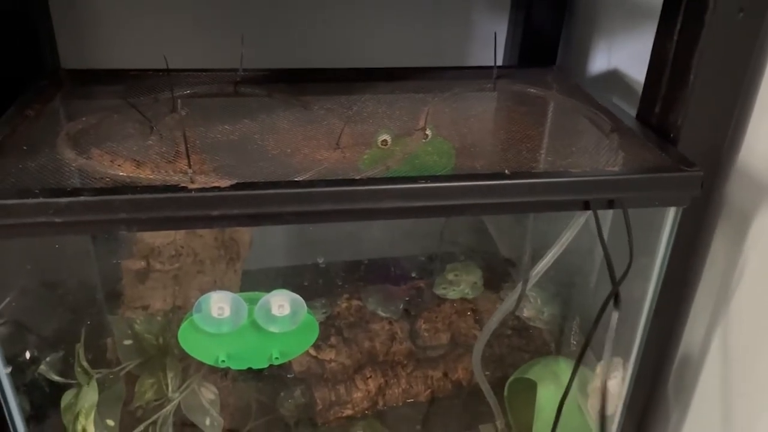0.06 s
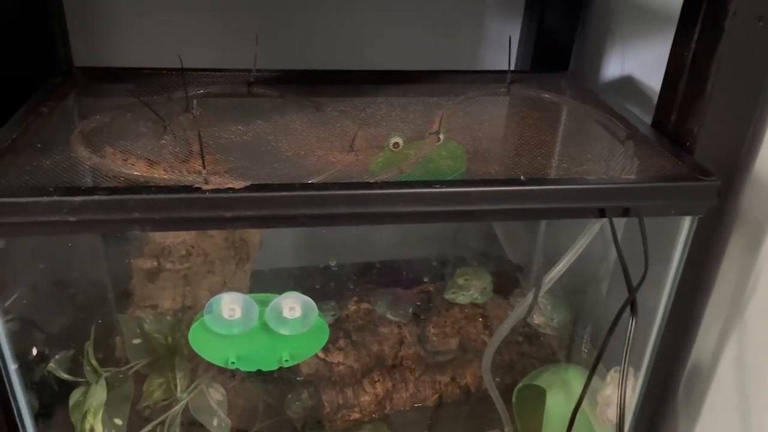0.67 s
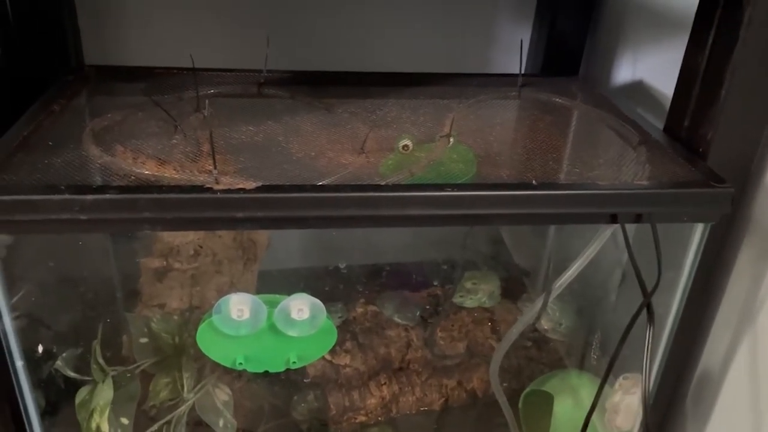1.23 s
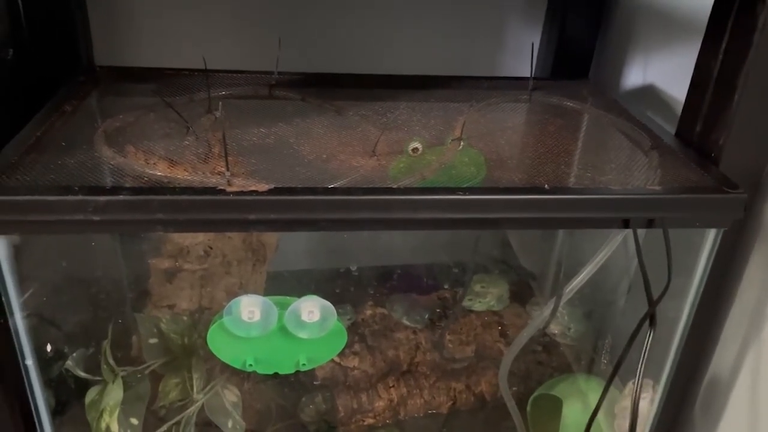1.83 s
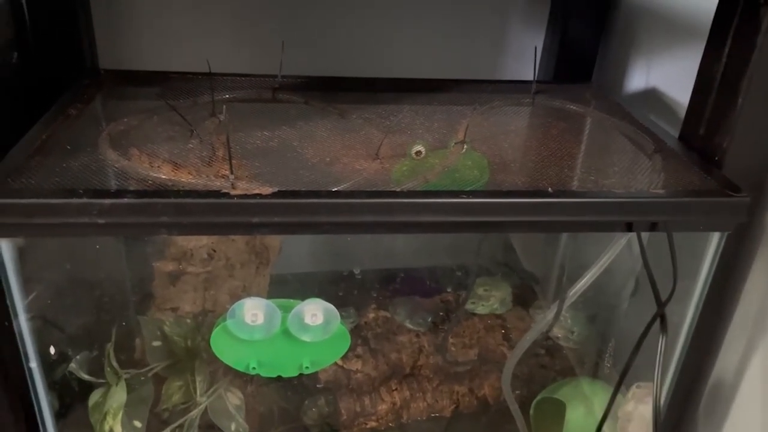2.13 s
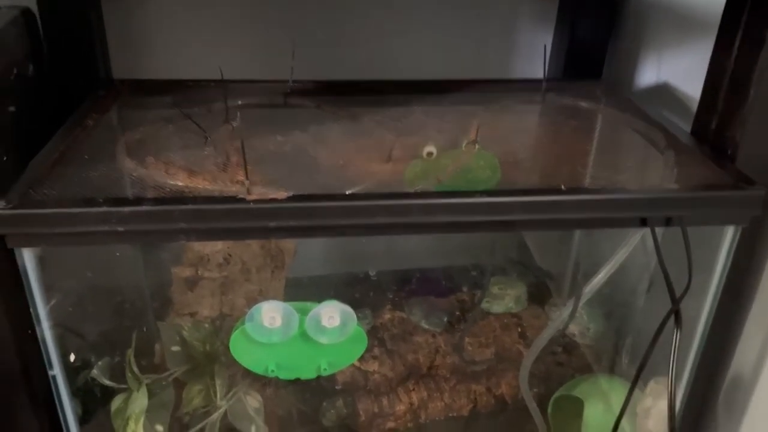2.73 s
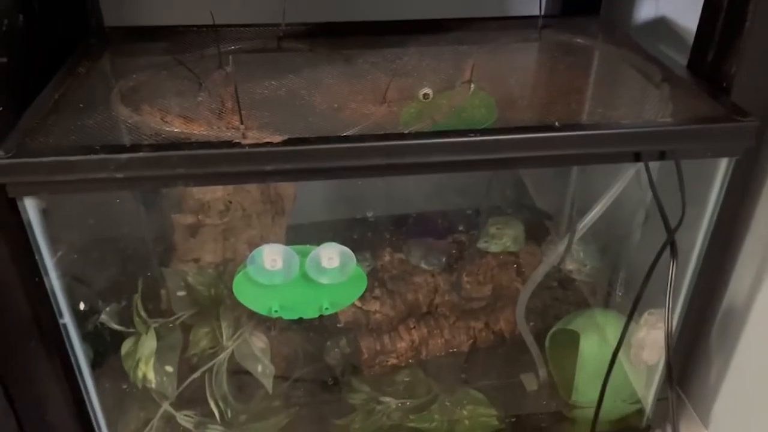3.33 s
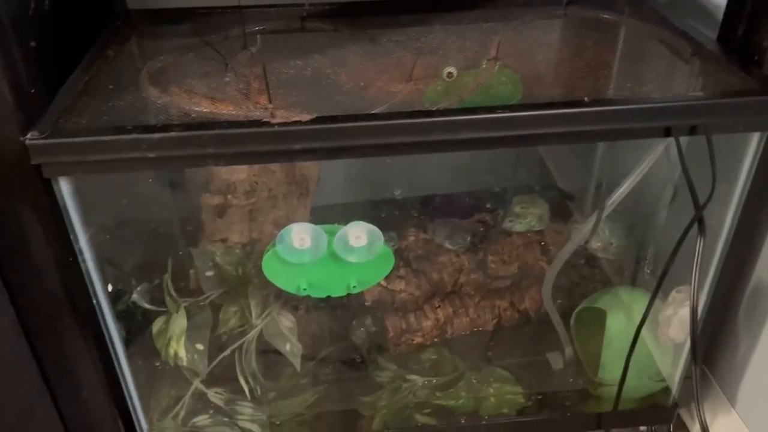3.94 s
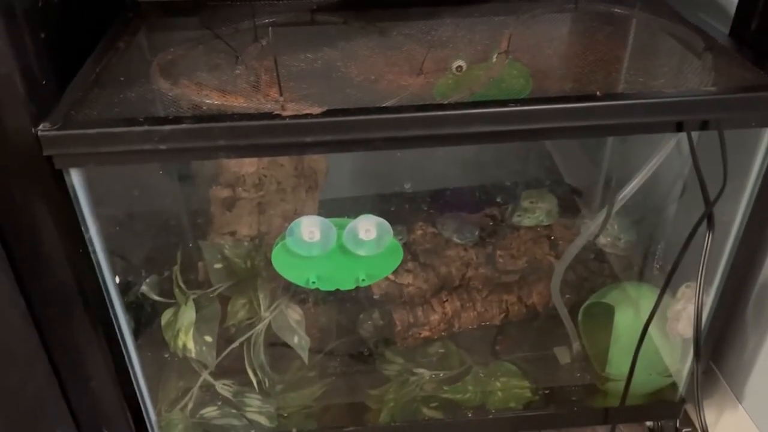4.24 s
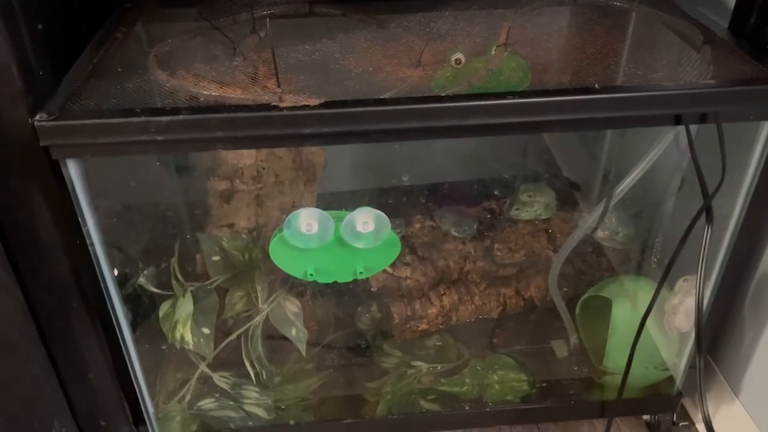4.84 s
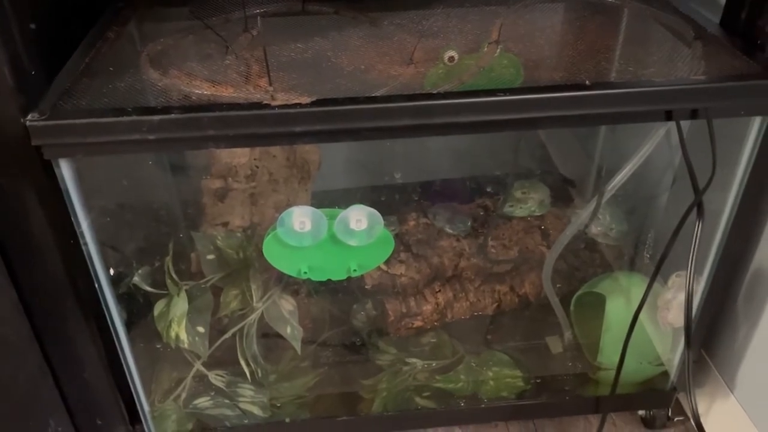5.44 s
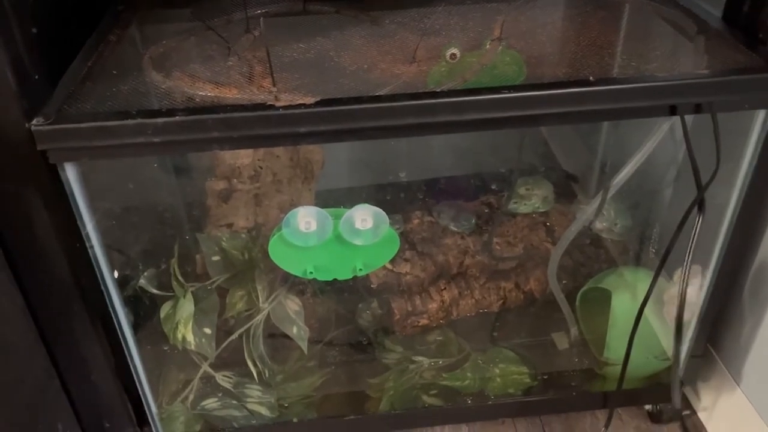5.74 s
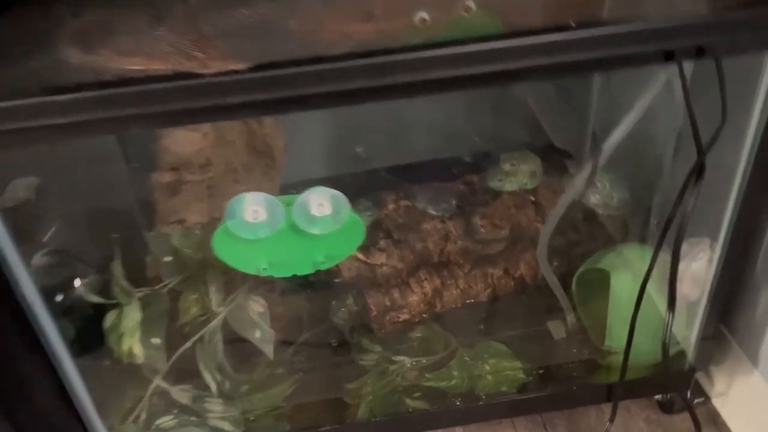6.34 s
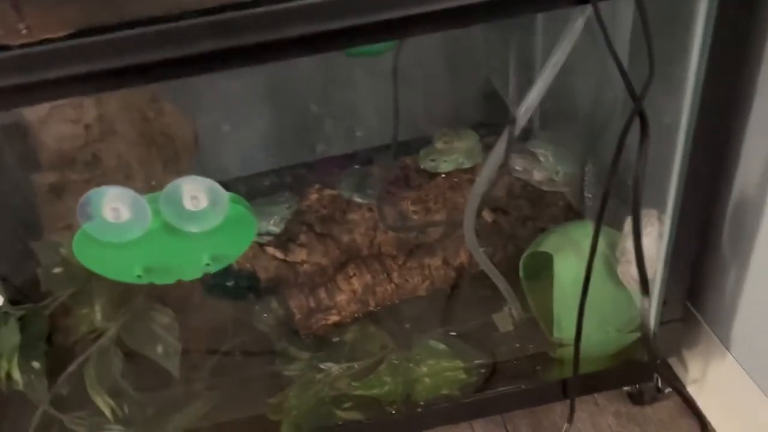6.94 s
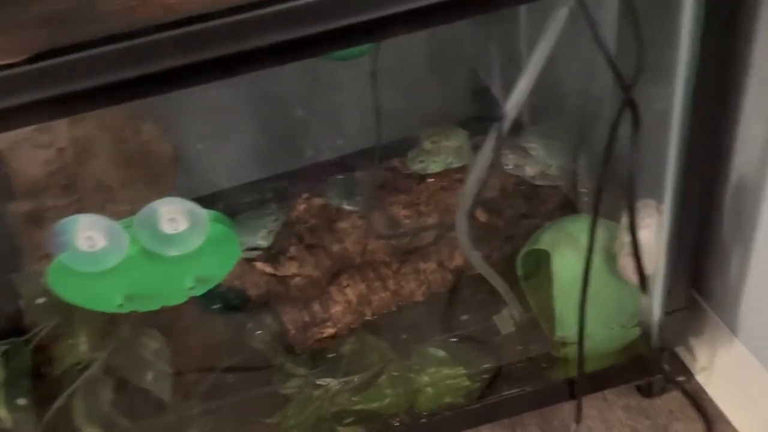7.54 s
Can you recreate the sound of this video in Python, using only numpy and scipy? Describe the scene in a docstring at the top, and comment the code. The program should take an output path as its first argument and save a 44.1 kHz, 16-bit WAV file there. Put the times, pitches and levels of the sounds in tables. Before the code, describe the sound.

Light knocks, plastic ticks and a few soft plops sound over the faint hum of a tank pump indoors. A person moves near the microphone, clothes swishing and floorboards thumping under their weight. A sharp knock rings the tank's stand, two heavier steps follow, then comes the loudest knock and another just after. Clothes rustle and water drips faintly while the hum carries on.

```python
"""Shifting about beside a water tank

A small pump hums beside a glass tank in a quiet room, and now and then a faint drip rings a bubble
in the water. Someone moves close by: clothes rub and swish, and the floorboards rumble, thump,
clack and creak under the weight. Light plastic ticks come and go, and a few sharp knocks set the
tank's stand ringing."""
import sys
import numpy as np
from scipy import signal
from scipy.fft import rfft, irfft, next_fast_len
from scipy.io import wavfile
from scipy.ndimage import uniform_filter1d, map_coordinates

SR = 44100
rng = np.random.default_rng(int(sys.argv[2]) if len(sys.argv) > 2 else 0)


def generate_wav(sig):
    """Save sig (samples, or channels by samples) to the path in sys.argv[1] as 16-bit PCM at SR."""
    pcm = np.round(np.clip(np.atleast_2d(sig).T, -1, 1) * 32767).astype(np.int16)
    wavfile.write(sys.argv[1], SR, pcm)


N = 334719
TIME = np.arange(N) / SR
AGE = np.arange(SR * 2 // 5) / SR  # seconds since a hit


def amp(db):
    """Decibels to gain."""
    return 10 ** (np.asarray(db) / 20)


def unit(x):
    """Scale to rms 1."""
    return x / np.sqrt(np.mean(x ** 2) + 1e-20)


def crest(x, size=256):
    """Scale a hit so that its loudest few milliseconds have rms 1."""
    return x / np.sqrt(uniform_filter1d(np.mean(x ** 2, 0), size).max() + 1e-20)


def along(points, hz):
    """Read a curve of (freq_hz, value) points on a log frequency axis."""
    freqs, values = np.transpose(points)
    return np.interp(np.log(hz + 1), np.log(freqs + 1), values)


def wobble(rate_hz):
    """Smooth random modulation."""
    return map_coordinates(rng.standard_normal(int(N * rate_hz / SR) + 4), [TIME * rate_hz / SR])


def eq(x, points):
    """Minimum-phase EQ through (freq_hz, gain_db) points, so hits have no pre-ring."""
    n = x.shape[-1]
    m = 2 * next_fast_len(n // 2 + 2048)
    cepstrum = irfft(np.log(amp(along(points, np.fft.rfftfreq(m, 1 / SR)))))
    cepstrum[1:m // 2] *= 2
    cepstrum[m // 2 + 1:] = 0
    return irfft(rfft(x, m) * np.exp(rfft(cepstrum)), m)[..., :n]


def band(x, lo_hz, hi_hz):
    """Causal band-pass."""
    return signal.sosfilt(signal.butter(3, [lo_hz, hi_hz], "band", fs=SR, output="sos"), x)


# How alike left and right are: freq_hz, correlation
STEREO_IMAGE = [(60, 1), (130, 1), (290, 0.67), (640, -0.37), (1400, 0.41), (3100, 0.42), (7000, -0.084)]
def noise(n):
    """White stereo noise, centred in the bass and wide in the treble."""
    m = next_fast_len(n)
    width = np.arccos(np.clip(along(STEREO_IMAGE, np.fft.rfftfreq(m, 1 / SR)), -1, 1)) / 2
    white = rfft(rng.standard_normal((2, m)))
    mid, side = irfft(white * [np.cos(width), np.sin(width)], m)[:, :n]
    return np.array([mid + side, mid - side])


def noise_bed(spectrum):
    """Steady shaped stereo noise of rms 1."""
    return unit(eq(noise(N), spectrum))


# Room decay times: freq_hz, t60_s
ROOM_DECAY = [(150, 0.42), (600, 0.32), (2000, 0.23), (5000, 0.24), (12000, 0.13)]
def room_tail():
    """A fresh diffuse reverb tail, each frequency dying at its own speed."""
    hz, t, spectrum = signal.stft(noise(len(AGE)), SR, nperseg=256)
    decay = amp(-60 * t / along(ROOM_DECAY, hz)[:, None])
    tail = signal.istft(spectrum * decay, SR, nperseg=256)[1][:, :len(AGE)]
    return tail * (1 - np.exp(-AGE / 0.004))


# Tone of a contact: freq_hz, gain_db
CONTACT_EQ = [(200, 1), (550, 2.5), (900, -2.5), (1400, 2), (2100, 1.5), (2800, -4), (4800, -12.5),
              (7000, -21), (10000, -24.5), (13000, -29.5), (15500, -46.5)]
def burst(t60_s, room_db, attack_s):
    """The gritty crack of one contact, with centred low mids, and the room's answer."""
    grit = noise(len(AGE)) + 0.86 * band(rng.standard_normal(len(AGE)), 120, 1100)
    crack = grit * (1 - np.exp(-AGE / attack_s)) * amp(-60 * AGE / t60_s)
    return eq(crack + amp(room_db) * room_tail(), CONTACT_EQ)


def voiced(crack, body_db, clack_db, snap_db):
    """The hardness of a contact sets the balance of its low, middle and high bands."""
    top_db = snap_db - 10 + 0.6 * min(snap_db - clack_db, 0)  # a dull hit loses its very top first
    bands = [(body_db, 230, 850), (clack_db, 1000, 2900), (snap_db, 4025, 7000), (top_db, 7500, 14000)]
    return sum(amp(db) * crest(band(crack, lo_hz, hi_hz)) for db, lo_hz, hi_hz in bands)


def resonate(x, modes, gain_db):
    """A body resounds at its modes with whatever shakes it."""
    ring = sum(amp(db) * signal.lfilter(*signal.iirpeak(hz, hz * t60 / np.log(9), SR), x)
               for hz, db, t60 in modes)
    return x + amp(gain_db) * ring


# Tone of the building's rumble and of the air: freq_hz, gain_db
RUMBLE_EQ = [(20, -32.5), (35, -18), (50, 5.5), (64, 4), (80, -6.5), (120, -12.5), (170, -26), (300, -55.5),
             (2000, -120)]
AIR_EQ = [(80, 0), (200, -3.5), (400, -2), (600, -3.5), (790, -16.5), (1000, -20.5), (1300, -17.5),
          (1800, -24.5), (3100, -20), (4000, -32), (6300, -35.5), (11000, -42.5), (14500, -67)]
def room_tone():
    """Low rumble of the building under a faint airy hiss."""
    rumble = amp(-54) * noise_bed(RUMBLE_EQ) * amp([[-0.6], [0.6]])
    air = amp(-62.5 + 0.8 * wobble(3)) * noise_bed(AIR_EQ)
    return rumble + air


# Fader moves on the motor hum: time_s, level_db
MOTOR_FADER = [(0, -53), (0.4, -46.5), (3.1, -49), (3.7, -57), (7.59, -55.5)]
# Mains hum and its overtones: pitch_hz, level_db
MAINS_PARTIALS = [(60, -60.5), (120, -68.5), (360, -77), (480, -90), (540, -64), (600, -81.5)]
def pump(motor_hz=68.8):
    """The motor's low hum, slightly unsteady, with thin mains overtones."""
    hum_db = np.interp(TIME, *np.transpose(MOTOR_FADER)) + 2
    turns = np.cumsum(motor_hz + 0.25 * wobble(2)) / SR
    out = amp(hum_db + 0.67 * wobble(4)) * unit(np.sin(2 * np.pi * turns)) * amp([[-1.1], [1.1]])
    for hz, db in MAINS_PARTIALS:
        # standing waves in the room give each microphone its own phase
        phase = hz / 900 * np.array([[0.8], [-0.8]]) + 0.17 * wobble(5)
        out += amp(db + 1.2 * wobble(3)) * unit(np.sin(2 * np.pi * hz * TIME + phase))
    return out


# Drips and low plops: start_s, level_db, pitch_hz, t60_s
DRIPS = [(0.004, -46, 1644, .065), (0.252, -47.5, 1550, 0.065), (0.274, -50, 1715, 0.061),
         (0.848, -41, 400, 0.055), (0.9, -56, 338, .05), (0.935, -49, 390, 0.051), (1.042, -43, 364, 0.043),
         (1.467, -39.5, 387, 0.049), (1.503, -41.5, 329, 0.037), (5.164, -53, 1446, 0.12),
         (5.868, -43, 332, .06), (6.705, -44, 930, 0.018), (7.053, -44, 1000, .018), (7.08, -43, 427, .04),
         (7.109, -45, 1000, .016), (7.127, -44.5, 980, 0.014), (7.203, -47, 1037, .018),
         (7.249, -44.5, 1067, 0.014)]
def drips(glide_per_s=0.84, echo_db=-9, splash_db=4, trim_db=-12):
    """Each drop splashes and traps a bubble whose pitch rises as it dies; the room echoes it."""
    out = np.zeros((2, N))
    for s, db, hz, t60 in DRIPS:
        chirp = np.sin(2 * np.pi * hz * AGE * (1 + glide_per_s * AGE))[None]
        bubble = chirp * amp(-60 * AGE / t60) * (1 - np.exp(-AGE / 0.0012))
        echo = signal.fftconvolve(bubble, room_tail(), axes=1)[:, :len(AGE)]
        splash = band(burst(t60_s=0.03, room_db=-18, attack_s=0.0027), hz * 0.58, hz * 1.2)
        drip = crest(bubble) + amp(echo_db) * crest(echo) + amp(splash_db) * crest(splash)
        add(out, s, amp(db + trim_db) * drip)
    return out


# Cloth moves: peak_s, length_s, rub_db, swish_db
CLOTH_MOVES = [(0.027, 0.082, -60.5, -63), (0.405, .08, -53.5, -63), (0.48, 0.075, -52, -54.5),
               (0.928, 0.14, -58, -68), (1.143, 0.14, -57, -60.5), (1.504, 0.076, -53, -56.5),
               (2.2, 0.41, -60, -61.5), (2.847, 0.042, -59, -65), (3.033, 0.26, -58.5, -66),
               (3.19, 0.13, -49.5, -58), (4.545, 0.14, -68.5, -61.5), (4.74, .2, -69, -63.5),
               (6.147, 0.11, -62.5, -64), (6.317, 0.093, -65.5, -51), (6.93, 0.068, -48.5, -65),
               (6.969, 0.042, -47, -62), (7.003, 0.1, -47.5, -48), (7.083, 0.087, -44, -54.5),
               (7.253, .12, -57, -68), (7.421, 0.096, -51.5, -61.5)]
def movement(rise_share=0.42):
    """Every move gathers speed, then ebbs: envelopes for the rub and the swish."""
    peak_s, length_s, rub_db, swish_db = np.transpose(CLOTH_MOVES)[:, :, None]
    slope_s = length_s * np.where(TIME < peak_s, rise_share, 1 - rise_share)
    swell = np.exp(-np.abs(TIME - peak_s) / slope_s)
    return [np.linalg.norm(amp(db) * swell, axis=0) for db in (rub_db, swish_db)]


# Tone of the dull rub and of the brighter swish: freq_hz, gain_db
RUB_EQ = [(100, -19.5), (180, 1.5), (350, 1.5), (550, -2.5), (800, -12), (1500, -45.5), (12000, -74)]
SWISH_EQ = [(400, -15), (900, -2.5), (1600, 1), (3000, -10.5), (6000, -20.5), (12000, -30.5),
            (14500, -54.5)]
def clothes(rub_envelope, swish_envelope):
    """Cloth rubs and swishes in uneven catches."""
    catch, grain = wobble(45), wobble(120)
    rub = rub_envelope * amp(1.5 + 2.4 * catch) * noise_bed(RUB_EQ)
    swish = swish_envelope * amp(-2.5 + 1.1 * catch + 3.9 * grain) * noise_bed(SWISH_EQ)
    return rub + swish


# Weight shifts on the floor: peak_s, level_db
WEIGHT_SHIFTS = [(2.13, -41), (3.06, -45), (3.5, -52), (4.83, -45), (5.34, -52)]
def floor_rumble(rub_envelope, rise_db_per_s=122, fall_db_per_s=106.5, follow_db=-4):
    """The floor rumbles as weight comes onto it, and a little with every movement."""
    load = sum(amp(db - np.maximum((s - TIME) * rise_db_per_s, (TIME - s) * fall_db_per_s))
               for s, db in WEIGHT_SHIFTS)
    envelope = np.hypot(load, amp(follow_db) * rub_envelope)
    return envelope * unit(band(noise(N), 95, 175)) * amp([[-1], [1]])


# Light plastic ticks: start_s, level_db
PLASTIC_TICKS = [(0.0373, -60), (0.4317, -59), (0.5295, -49), (0.7425, -45), (1.168, -56), (1.5714, -61),
                 (1.6294, -61), (1.7648, -55.5), (3.034, -58.5), (3.3762, -54), (4.7995, -42),
                 (5.6044, -56), (7.1721, -53)]
def ticks(trim_db=-8.5):
    """Tiny contacts make short, bright clicks a little to the left."""
    out = np.zeros((2, N))
    for s, db in PLASTIC_TICKS:
        click = band(burst(t60_s=0.026, room_db=-12.5, attack_s=0.00039), 1200, 15500)
        brightened = eq(click, [(2500, -11.5), (10000, -2.5)])
        add(out, s, amp(db + trim_db) * crest(brightened), pan_db=3)
    return out


# Modes of the stand and its tank: pitch_hz, level_db, t60_s
STAND_MODES = [(157.8, 1.5, 0.23), (220.4, -7, 0.24), (308.6, -1, 0.23), (370, -13.5, .16), (494, -1, 0.15),
               (582.6, 3, 0.11), (747, -7, 0.13), (1202, -7, .18), (1290, -7.5, 0.085), (1494, -8, 0.14),
               (1537, -11, .18), (1710, -7, 0.18), (2003, -2, 0.094), (2180, -10, .17), (2700, -12, 0.19),
               (3510, -10, 0.095), (3870, -13.5, .15), (4520, -13.5, .13)]
def stand_ring(body_db, snap_db, left_lag_s=0.00015):
    """The stand rings with a new balance each time; a harder blow feeds the higher modes."""
    hz, level_db, t60 = np.transpose(STAND_MODES)[:, :, None]
    lag_s = np.array([left_lag_s, 0])[:, None, None]
    phase = rng.uniform(0, 2 * np.pi, hz.shape) - 2 * np.pi * hz * lag_s
    drive_db = np.interp(hz, [600, 1300, 4000], [body_db, 0, snap_db])
    decay = amp(level_db + drive_db + rng.normal(0, 0.93, hz.shape) - 60 * AGE / t60)
    modes = decay * np.sin(2 * np.pi * hz * AGE + phase)
    return crest(modes.sum(1) * (1 - np.exp(-AGE / 0.0045)))


# Knocks on the stand: start_s, clack_db, body_re_clack_db, snap_re_clack_db, thump_db, pan_db
STAND_KNOCKS = [(0.304, -49.5, 8, -23.5, -43, 0.5), (0.361, -43, -0.5, -26, -40, 3),
                (0.492, -44, -8.5, -27, -42, 2), (3.131, -66, 17, -11, -58, -4),
                (4.871, -51, 3, -3.5, -39.5, -4), (4.894, -29, -13.5, 2.5, -40, 1.5),
                (4.8972, -23.5, -15.5, -7.5, -32.5, 1.5), (6.352, -33, -3, -18.5, -54, 1.5),
                (6.3618, -16.5, -0.5, -8.5, -30, 1.5), (6.569, -30.5, -2.5, -22.5, -45, -0.5),
                (6.575, -26, -9, -14.5, -40, 3)]
def knocks(ring_db=-2, plank_db=-9):
    """Hard blows crack against the stand, ringing it and the floor under it."""
    cracks, rings = np.zeros((2, 2, N))
    for s, db, body_db, snap_db, thump_db, pan_db in STAND_KNOCKS:
        stand = amp(db + body_db + ring_db) * stand_ring(body_db, snap_db)
        softness = np.interp(db, [-44, -30], [2.5, 1])  # light blows linger longer than firm ones
        crack = burst(t60_s=0.023 * softness, room_db=-20.5, attack_s=0.0015 * softness)
        add(cracks, s, amp(db) * voiced(crack, body_db, 0, snap_db), pan_db)
        add(rings, s, stand + amp(thump_db) * floor_thump() + amp(db + plank_db) * plank_ring())
    return resonate(cracks, STAND_MODES, gain_db=1) + rings


# Low modes of the floor: pitch_hz, level_db, t60_s
FLOOR_MODES = [(52, -21, 0.36), (88, -9.5, 0.33), (117.8, 4.5, 0.15), (144.6, -0.5, 0.22),
               (190, -16.5, 0.18)]
def floor_thump(lag_s=0.012, rise_s=0.014, room_db=-15):
    """The floor gives way slowly; its modes swell together, then beat."""
    ring = np.zeros((2, len(AGE)))
    for hz, db, t60 in FLOOR_MODES:
        decay = amp(db + rng.normal(0, 0.72) - 60 * AGE / t60)
        detuned_hz = hz * rng.normal(1, 0.0071)
        ring += decay * np.sin(2 * np.pi * detuned_hz * (AGE - lag_s) + rng.normal(0, 0.3, (2, 1)))
    swell = 1 - np.exp(-(AGE / rise_s) ** 2)
    thump = crest(ring * swell * amp([[-1.2], [1.2]]))
    return thump + amp(room_db) * crest(band(room_tail(), 91, 260))


# Clack modes of a plank: pitch_hz, level_db, t60_s
PLANK_MODES = [(430, -6.5, 0.4), (627, 7.5, 0.12), (1150, -3, 0.065), (1615, -4, 0.13), (2031, 6.5, 0.05),
               (2650, -0.5, 0.13), (4300, -11, 0.1)]
def plank_ring():
    """A struck plank rings freely, with its own phase at each microphone."""
    hz, level_db, t60 = np.transpose(PLANK_MODES)[:, :, None]
    phase = rng.uniform(0, 2 * np.pi, hz.shape) + hz / 1500 * rng.standard_normal((2, len(hz), 1))
    decay = amp(level_db + rng.normal(0, 3.9, hz.shape) - 60 * AGE / t60)
    modes = decay * np.sin(2 * np.pi * hz * AGE + phase)
    return crest(modes.sum(1) * (1 - np.exp(-AGE / 0.00091)))


# Steps and bumps on the floor: start_s, clack_db, brightness_db, thump_db
FOOTSTEPS = [(0.605, -65, -39, -50), (1.036, -62, -27, -51), (1.152, -57, -18, -43.5),
             (1.465, -64, -17, -62), (1.907, -50.5, -25.5, -39.5), (1.933, -58, -27, -41.5),
             (2.073, -52.5, -24.5, -43), (2.164, -42, -16.5, -33), (2.237, -59.5, -13, -56),
             (2.345, -44.5, -5.5, -38.5), (2.448, -54.5, -8.5, -49.5), (2.585, -60, -21, -47.5),
             (2.982, -62.5, -22, -43), (3.155, -50, -1.5, -46), (3.22, -33, -3, -22),
             (3.438, -50.5, -6, -38), (3.462, -47, -15, -34), (3.488, -49, -0.5, -48.5),
             (3.846, -68, -12, -58), (4.093, -62, -12, -56), (4.192, -67, -14, -55),
             (5.379, -32, -1.5, -21.5), (5.445, -32, -1, -29.5), (5.653, -57, -9, -59.5),
             (6.115, -61, -6.5, -48), (6.815, -56, -8.5, -55.5), (7.399, -60, -7, -50.5)]
def footsteps(scuff_db=-17, scuff_lead_s=0.0097, plank_db=-10, boom_db=3, pan_db=1.6):
    """Each step scuffs, clacks on the boards and sets the floor booming."""
    clacks, booms = np.zeros((2, 2, N))
    for s, db, bright_db, thump_db in FOOTSTEPS:
        # brightness tilts treble against bass around the clack
        body_db = db - 2 - 0.39 * bright_db
        snap_db = db - 2 + 0.61 * bright_db
        softness = np.interp(bright_db, [-22, -3], [1.55, 1.05])  # dull steps are slower and longer
        crack = burst(t60_s=0.038 * softness, room_db=-16, attack_s=0.0031 * softness)
        add(clacks, s - 0.0015, voiced(crack, body_db, db - 1.7, snap_db - 2.37), pan_db)
        scuff = voiced(burst(t60_s=0.021, room_db=-19, attack_s=0.004), body_db, db, snap_db - 7.5)
        add(clacks, s - scuff_lead_s, amp(scuff_db) * softness * scuff, pan_db)
        add(booms, s, amp(thump_db + boom_db) * floor_thump() + amp(db + plank_db) * plank_ring())
    return resonate(clacks, PLANK_MODES, gain_db=-4.5) + booms


def creak(start_s=1.824, slips=4, gap_s=0.0222, level_db=-62.5):
    """A board slips a few times at an even pace, on one thin resonance and its octave."""
    out = np.zeros((2, N))
    for k in range(slips):
        slip = burst(t60_s=0.02, room_db=-15.5, attack_s=0.00088)
        squeak = crest(band(slip, 2770, 3540)) + amp(-7.5) * crest(band(slip, 5500, 8000))
        add(out, start_s + k * gap_s, squeak)
    return amp(level_db) * out


def add(track, start_s, sound, pan_db=0):
    """Mix a sound onto a track; pan_db is left over right."""
    start = max(round(start_s * SR), 0)
    part = (sound * amp([[pan_db / 2], [-pan_db / 2]]))[:, :N - start]
    track[:, start:start + part.shape[1]] += part


def scene():
    """The mix: movement and drips over a bed of pump hum and room tone."""
    rub, swish = movement()
    return (footsteps() + floor_rumble(rub) + knocks() + ticks() + creak() + drips()
            + clothes(rub, swish) + pump() + room_tone())


# Notch of the microphone ports: freq_hz, gain_db
MIC_PORT_EQ = [(7000, -0.5), (7600, -5.5), (8200, -14), (8800, -7.5), (9400, 1.5)]
def record(dry, cutoff_hz=15900):
    """The microphone ports notch the treble; a brick-wall low-pass takes off the very top."""
    m = next_fast_len(N + SR // 2)
    passband = np.fft.rfftfreq(m, 1 / SR) < cutoff_hz
    return irfft(rfft(eq(dry, MIC_PORT_EQ), m) * passband, m)[:, :N]


dry = scene()
out = record(dry)
generate_wav(out)
```